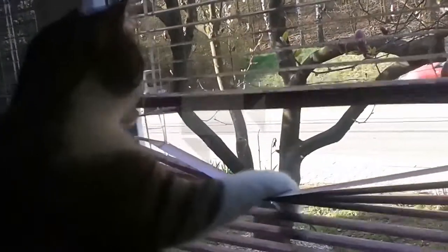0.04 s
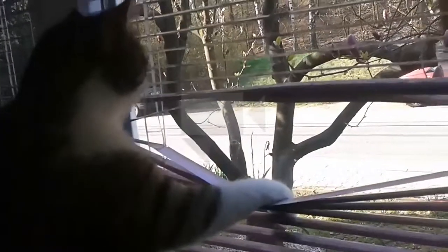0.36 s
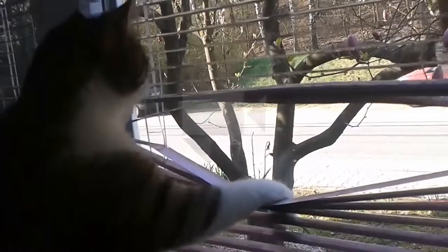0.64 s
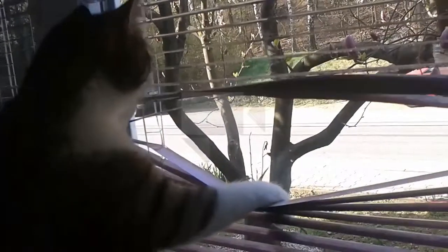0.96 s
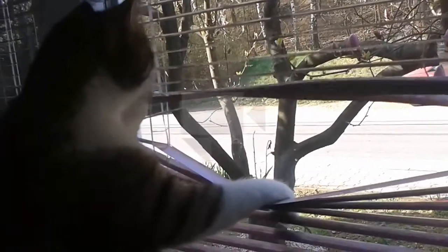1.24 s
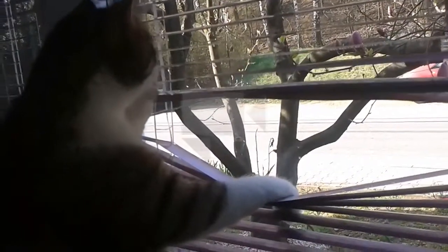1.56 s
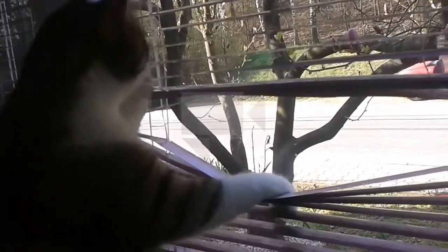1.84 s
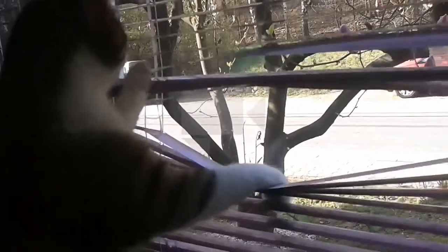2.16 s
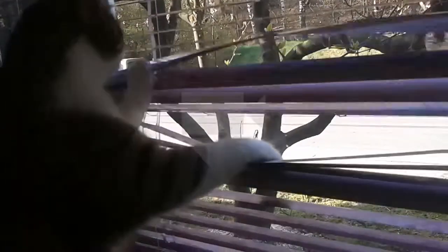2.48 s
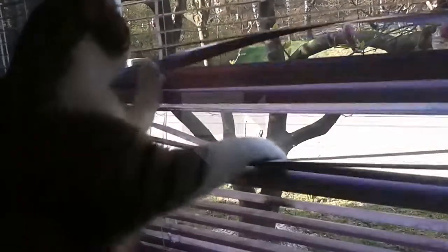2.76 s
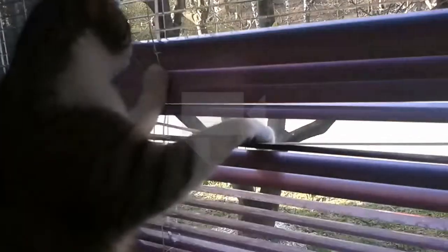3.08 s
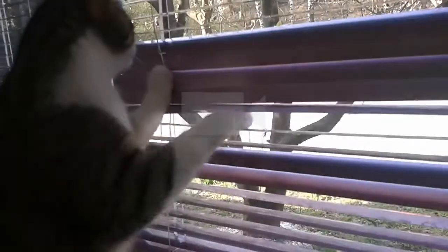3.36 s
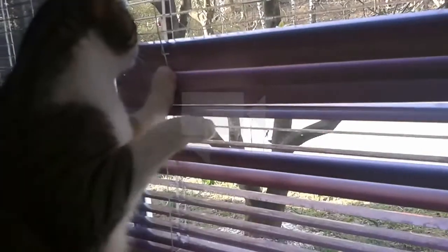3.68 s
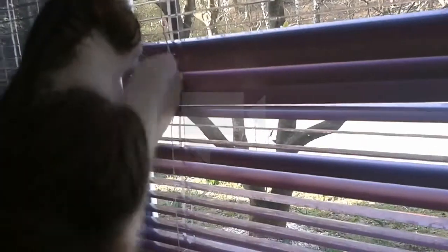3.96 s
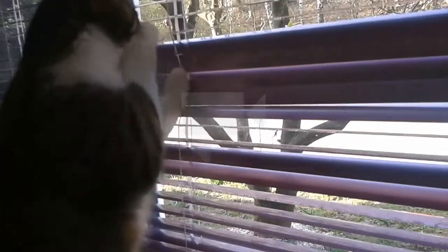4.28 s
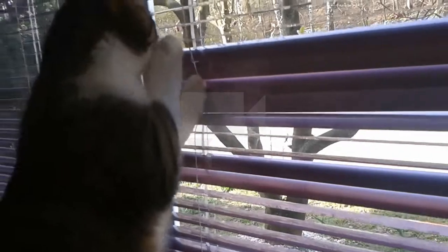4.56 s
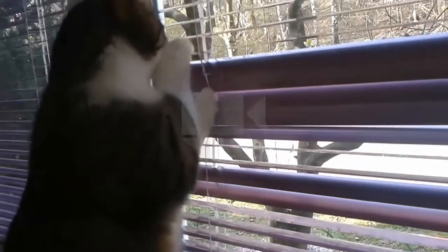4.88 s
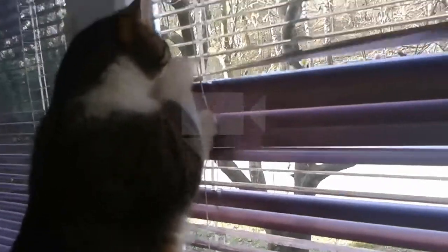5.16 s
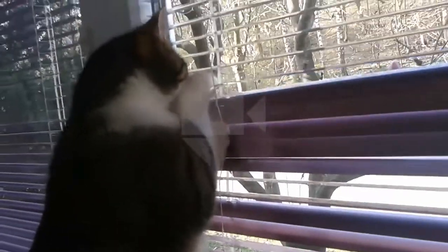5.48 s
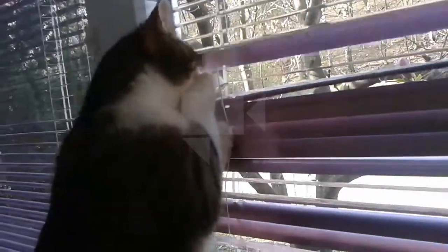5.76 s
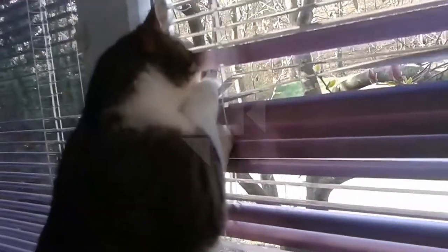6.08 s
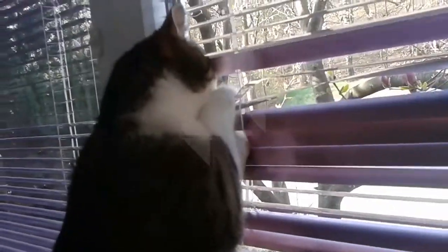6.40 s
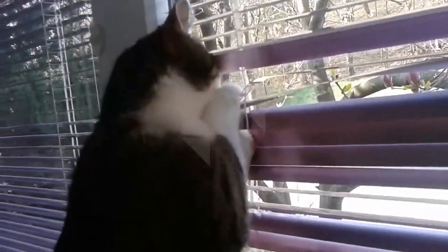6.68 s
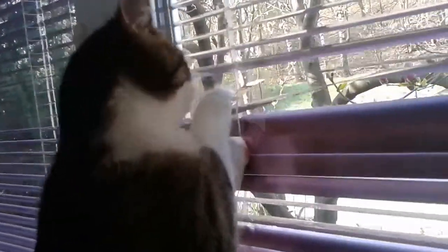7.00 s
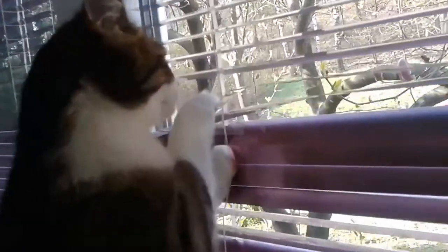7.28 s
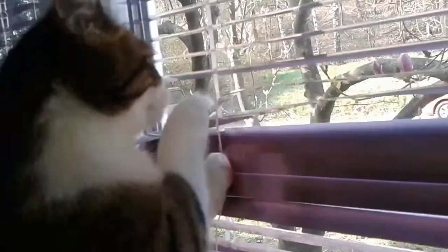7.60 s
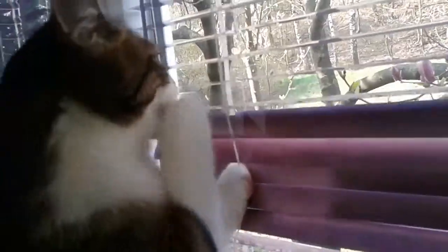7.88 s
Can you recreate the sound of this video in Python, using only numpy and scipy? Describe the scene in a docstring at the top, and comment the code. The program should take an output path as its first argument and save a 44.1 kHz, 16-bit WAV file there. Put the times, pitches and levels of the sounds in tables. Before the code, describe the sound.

A cat paws at window blinds in a quiet room, heard close up with a short room echo and steady faint hiss. A small snap and scrape open the sound, followed by soft pats and rustles until about 1.2 seconds. After a lull, the slats scrape at 2.4 seconds, then break into a loud, bright clatter with tiny squeaks from 2.8 to 3 seconds. Another sharp snap lands at 3.3 and a lighter scrape at 3.6. The blind rings briefly with a thin metallic tone after the harder hits. Fur brushes faintly along the slats between knocks. A single sharp snap comes at 5 seconds, short scrapes at 5.5 and 5.8, then light ticks and pats from 6 to 7.4. The loudest burst of snapping, rattling slats arrives at about 7.8 seconds, ringing briefly at the end.

```python
"""A quiet room, close to the window blinds: a cat pushes its paws through them.
Slats scrape, snap and clatter in bursts of tiny collisions; some edges stick and squeak.
Fur brushes the slats between knocks. The blind rings near 1.3 kHz after the harder ones,
and the room adds a short tail over steady hiss."""
import sys
import numpy as np
from scipy import signal
from scipy.io import wavfile
from scipy.ndimage import uniform_filter1d

SR = 44100
rng = np.random.default_rng(int(sys.argv[2]) if len(sys.argv) > 2 else 0)


def unload_wav(signal):
    """Save mono or channel-first audio to the path in sys.argv[1] as 16-bit WAV at rate SR, clipped to [-1, 1]."""
    wavfile.write(
        sys.argv[1],
        SR,
        np.round(np.clip(np.atleast_2d(signal).T, -1, 1) * 32767).astype(np.int16),
    )


N = 350154


def clatters(gain_db=5, modes_db=-39, ripple_db=3.6):
    """Each push is a burst of collisions, coloured by where and how hard the slats meet."""
    # slat collision spectrum: (frequency [Hz], gain [dB])
    slat_spectrum = [(30, -28), (90, -22.5), (175, -7.5), (350, -3.5), (800, 2), (1100, -1), (1850, -1),
                     (2700, 2), (3700, -4), (5400, 2.5), (7200, -3.5), (9500, 1.5), (12500, 1),
                     (15500, -8.5)]
    ripple_hz = np.geomspace(400, 16000, num=110)
    thinning, gentle_db = .28, -60
    out = np.zeros(N)
    for start_s, rise_s, t60_s, level_db, knock_db, fizz_db in contacts():
        force = stroke(rise_s, t60_s)
        impacts = collisions(len(force), per_s=3000, spread_db=2.5, rub=.57)
        burst = np.pad(force * impacts, (0, 1024))
        thud_db = knock_db - thinning * (level_db - gentle_db)  # harder contact, thinner bass
        contact_spectrum = [(200, 1 + 1.05 * thud_db), (750, thud_db), (1600, knock_db),
                            (3000, knock_db), (4400, 0), (6800, 0), (9500, fizz_db)]
        # each length of slat has its own short-lived resonances
        ripple = np.c_[ripple_hz, ripple_db * np.clip(rng.standard_normal(len(ripple_hz)), -2, 2)]
        burst = colour(burst, slat_spectrum, contact_spectrum, ripple)
        add(out, start_s, amp(level_db + gain_db) * slat_modes(burst, modes_db))
    return out


def contacts():
    """All slat contacts: (time [s], rise [s], t60 [s], level [dB], knock [dB], fizz [dB])."""
    # knock (mids) and fizz (top treble) are relative to the level
    # bent slat flicks past its neighbour: (time [s], rise [s], level [dB], knock [dB], fizz [dB])
    snaps = [(.0004, 0.0083, -22, 0.5, -16), (0.0841, 0.0057, -30, -7.5, -6), (.116, .003, -35, -10, -5),
             (2.449, .01, -26, 4.5, -3), (2.9589, 0.0043, -17, 1.5, -6), (2.972, .0044, -12, -12, -5),
             (2.979, 0.0062, -13.5, -5.5, -6), (3.309, .007, -11.5, -1, -8.5),
             (4.9858, 0.0088, -13, -14, -5.5), (7.815, 0.0019, -9.5, -8, -11),
             (7.8203, 0.0029, -9, -5, -2.5), (7.829, .0014, -9.5, -7, -1)]
    # soft paw pats slats together: (time [s], level [dB], knock [dB])
    pats = [(.231, -41, 9), (.289, -39, 3), (.328, -51, 18), (.351, -41, 11), (.480, -35.5, 6.5),
            (.952, -43, 3.5), (1.126, -43.5, 12), (2.107, -56, 12.5), (2.147, -51.5, 11),
            (2.267, -45.5, 1.5), (5.274, -51, 9), (5.846, -44.5, 17), (6.858, -41, 1), (6.955, -38.5, -1.5),
            (7.176, -40, 1.5), (7.799, -25.5, 0)]
    # slats slide under growing pressure: (time [s], rise [s], t60 [s], level [dB], knock [dB])
    scrapes = [(.011, 0.025, 0.25, -38, 1), (.354, 0.016, .23, -41, 8), (1.002, .021, .16, -46.5, -6),
               (1.146, 0.026, 0.23, -52.5, 10), (2.351, 0.053, .6, -38.5, -2),
               (2.412, 0.013, 0.23, -27.5, 0), (2.598, .014, .08, -38.5, 1.5),
               (2.837, .033, .13, -19.5, -5.5), (2.8773, 0.035, 0.36, -27.5, -8.5),
               (2.911, 0.036, 0.4, -21.5, -6.5), (3.594, .026, 0.19, -32, 2),
               (5.447, 0.048, 0.14, -47.5, 4.5), (5.532, 0.046, 0.067, -26, -0.5),
               (5.845, .025, .16, -26.5, -1.5), (5.879, 0.024, .15, -35.5, 7.5),
               (6.071, .041, .22, -46, 4.5), (6.127, .014, .12, -41.5, 6), (6.86, 0.01, 0.21, -45, 4.5),
               (7.838, 0.0072, 0.17, -14, -4.5), (7.865, 0.0035, 0.19, -24.5, -2.5),
               (7.907, .021, .13, -31, -7)]
    # slat edge ticks against a cord: (time [s], level [dB])
    ticks = [(6.012, -26.5), (7.4015, -29)]
    return ([(s, rise, .057, db, knock, fizz) for s, rise, db, knock, fizz in snaps]
            + [(s, .0059, .098, db, knock, -12.5) for s, db, knock in pats]
            + [(s, rise, t60, db, knock, -7.5) for s, rise, t60, db, knock in scrapes]
            + [(s, .0017, .02, db, -7.5, -22) for s, db in ticks])


def slat_modes(burst, gain_db, size=12000):
    """Collisions set the slats ringing; tuning varies by slat, most in the high modes."""
    # slat bending modes: (frequency [Hz], relative level [dB], t60 [s])
    bending_modes = [(1735, -26, 0.085), (2613, -12, 0.13), (3185, -13.5, 0.17), (3590, -4.5, 0.1),
                     (4200, -27, 0.23), (4460, -23, 0.2), (5000, -17, 0.26), (5570, -26, 0.091),
                     (6300, -10, 0.11), (6810, -26, 0.073), (7840, -13, 0.15), (8172, -14, .11),
                     (8500, -28, .11), (9900, -20, 0.23), (11600, -23, .1), (12700, -20, .11)]
    hz, level_db, t60_s = np.transpose(bending_modes)[:, :, None]
    t = np.arange(size) / SR
    share, phase, tuning = rng.random((3, len(hz), 1))
    hz = hz * (1 + (tuning - .5) * .07 * (hz / hz.max()) ** 2)
    envelope = amp(level_db + gain_db) * (.5 + share) * np.exp(-np.log(1000) * t / t60_s)
    modes = envelope * np.sin(2 * np.pi * (hz * t + phase))
    return np.pad(burst, (0, size - 1)) + signal.fftconvolve(burst, modes.sum(0))


def squeaks(glide_octaves=-.054, jitter=.012, overtone_db=-18):
    """An edge sticks and slips at an unsteady pitch that sags as it lets go."""
    # slipping edges: (time [s], length [s], pitch [Hz], level [dB])
    slips = [(.004, 0.0081, 5400, -21), (2.842, .032, 11840, -22), (2.844, 0.04, 6400, -24.5),
             (2.848, 0.022, 7750, -27.5), (2.851, .028, 4370, -15), (2.866, 0.016, 5780, -15),
             (2.929, .021, 2396, -30.5), (2.973, 0.0097, 2530, -18), (3.313, .011, 2580, -21.5),
             (3.316, .006, 4820, -18.5), (4.989, 0.012, 5850, -16.5), (4.992, .0075, 11880, -21),
             (7.8145, 0.0158, 5550, -7.5)]
    out = np.zeros(N)
    for start_s, length_s, hz, level_db in slips:
        position = np.linspace(-.5, .5, int(length_s * SR))
        pitch_hz = hz * 2 ** (glide_octaves * position) * (1 + jitter * waver(len(position), size=50))
        phase = 2 * np.pi * np.cumsum(pitch_hz) / SR
        tone = np.sin(phase) + amp(overtone_db) * np.sin(2 * phase) * (hz < SR / 4)
        grip = 1 + .3 * waver(len(position), size=50)
        window = np.cos(np.pi * position) ** 2
        add(out, start_s, amp(level_db) * unit(tone * grip) * window)
    return out


def blind_ring(slats, ring_hz=1296, width_hz=500, ring_t60_s=.35, gain_db=-8):
    """The whole blind stores contact energy near its note; loose slats roughen the ring."""
    # paw lets go, blind or slat rings freely: (time [s], swell [s], t60 [s], pitch [Hz], level [dB])
    releases = [(.332, .003, .06, 1720, -37), (.355, .003, .08, 1720, -34), (2.955, .008, .42, 1280, -36),
                (3.313, 0.011, 0.32, 1290, -39), (3.6, 0.022, 0.13, 1297, -31.5),
                (4.992, .005, .22, 6130, -35), (5.54, .025, .39, 1295, -34.5),
                (7.835, 0.017, .1, 1278, -25), (7.84, 0.013, .25, 3185, -28),
                (7.866, .013, .97, 1282, -29.5)]
    band = signal.butter(2, [ring_hz - width_hz / 2, ring_hz + width_hz / 2], "bandpass", fs=SR)
    drive = signal.lfilter(*band, slats) ** 2
    retention = amp(-120 / (ring_t60_s * SR))
    energy = signal.lfilter([1 - retention], [1, -retention], drive)
    out = amp(gain_db) * np.sqrt(energy) * bending_tone(N, ring_hz)
    for start_s, swell_s, t60_s, hz, level_db in releases:
        envelope = stroke(swell_s, t60_s)
        add(out, start_s, amp(level_db) * envelope * bending_tone(len(envelope), hz))
    flutter = unit(1 + .23 * waver(N, size=400))
    return out * flutter


def bending_tone(count, hz, drift_hz=10, shake_hz=20):
    """Sine, rms 1, whose pitch shifts as the slats bend."""
    bend_hz = drift_hz * waver(count, size=900) + shake_hz * waver(count, size=120)
    return np.sqrt(2) * np.sin(2 * np.pi * np.cumsum(hz + bend_hz) / SR)


def brushing(catch_db=2):
    """Fur and paws rub faintly along the slats, catching and letting go."""
    # rubbing as the cat moves: (time [s], level [dB])
    movement = [(0, -45.5), (.2, -54.5), (.45, -49), (.8, -55), (1.2, -55.5), (2, -60.5), (2.25, -53),
                (2.7, -55), (3.28, -49.5), (3.85, -54), (4.4, -59), (4.95, -59.5), (5.1, -51.5),
                (6.05, -52), (6.3, -61.5), (7.7, -55.5), (7.94, -47)]
    # rubbing spectrum: (frequency [Hz], relative level [dB])
    spectrum = [(40, -8.5), (150, -8.5), (400, 6), (900, 1), (2500, 7.5), (5500, -1.5), (8000, -4.5),
                (15500, -8)]
    level_db = np.interp(np.arange(N) / SR, *np.transpose(movement))
    level_db += catch_db * waver(N, size=900)
    grains = collisions(N, per_s=2000, spread_db=4, rub=1)
    return amp(level_db) * unit(colour(grains, spectrum))


def room(direct, gap_s=.0055):
    """Dense reflections after a short gap; the low mids last longest."""
    # reverberation time: (frequency [Hz], t60 [s])
    decay_times = [(200, .5), (530, 0.73), (1400, 0.19), (3700, 0.44), (9700, 0.28), (16000, 0.17)]
    # reverberation against direct sound: (frequency [Hz], level [dB])
    tail_levels = [(200, -7.5), (600, -4.5), (2400, -8), (5500, -15.5), (12000, -13.5)]
    hz, t, noise = signal.stft(rng.standard_normal(SR * 3 // 4), SR, nperseg=256)
    decay = np.exp(-np.log(1000) * t / read(decay_times, hz)[:, None])
    band_energy = (decay ** 2).sum(1, keepdims=True) * t[1] * SR
    decay *= amp(read(tail_levels, hz))[:, None] / np.sqrt(band_energy)
    tail = signal.istft(noise * decay, SR, nperseg=256)[1]
    return signal.fftconvolve(direct, np.pad(tail, (int(gap_s * SR), 0)))[:N]


def hiss(level_db=-53):
    """Steady noise of the room and microphone."""
    # hiss spectrum: (frequency [Hz], relative level [dB])
    spectrum = [(25, -21), (60, -19), (100, -0.5), (135, -2), (400, 3.5), (800, -2), (1400, -6.5),
                (1950, -10.5), (2350, 1.5), (2830, 9), (3300, -3), (4300, -9.5), (5000, 4.5), (6600, -17),
                (10000, -10.5), (15500, -19.5)]
    return amp(level_db) * unit(colour(rng.standard_normal(N), spectrum))


def collisions(count, per_s, spread_db, rub):
    """Tiny impacts of uneven size over smooth rubbing, rms 1."""
    sizes = amp(spread_db * np.clip(rng.standard_normal(count), -2, 2))
    signs = rng.choice([-1, 1], count)
    hits = rng.random(count) < per_s / SR
    return unit(unit(sizes * signs * hits) + rub * rng.standard_normal(count))


def stroke(rise_s, t60_s):
    """Contact envelope: builds ever faster, then dies away as the slats settle."""
    t = np.arange(int((rise_s + t60_s) * SR) + 2) / SR
    rise = np.minimum(t / rise_s, 1) ** 2
    return rise * np.exp(-np.log(1000) * np.maximum(t - rise_s, 0) / t60_s)


def colour(x, *spectra, size=4096):
    """Minimum-phase filter from summed (frequency [Hz], gain [dB]) spectra."""
    hz = abs(np.fft.fftfreq(size, 1 / SR))
    log_gain = np.log(amp(sum(read(points, hz) for points in spectra)))
    taps = np.fft.ifft(np.exp(np.conj(signal.hilbert(log_gain)))).real
    return signal.oaconvolve(x, taps[:size // 2])[:len(x)]


def waver(count, size):
    """Smooth noise, rms 1, changing over about size samples."""
    return unit(uniform_filter1d(uniform_filter1d(rng.standard_normal(count), size), size // 2))


def read(points, hz):
    """Interpolates (frequency [Hz], value) points over log frequency."""
    points_hz, values = np.transpose(points)
    return np.interp(np.log(hz + 1), np.log(points_hz + 1), values)


def add(mix, start_s, sound):
    """Mixes a sound in at start_s."""
    part = mix[max(round(start_s * SR), 0):][:len(sound)]
    part += sound[:len(part)]


def amp(db):
    """Decibels to gain."""
    return 10 ** (np.asarray(db) / 20)


def unit(x):
    """Scales to rms 1."""
    return x / np.sqrt(np.mean(x ** 2) + 1e-20)


def scene():
    """Slats, their room tail, the blind's ring and hiss, in mono."""
    slats = clatters() + squeaks() + brushing()
    return (slats + room(slats) + blind_ring(slats) + hiss())[None]


def record(dry):
    """Clips at full scale, then low-passes at 16 kHz."""
    low_pass = signal.firwin(1023, 16000, window=("kaiser", 9), fs=SR)
    return signal.oaconvolve(np.clip(dry, -1, 1), low_pass[None], "same")


dry = scene()
out = record(dry)
unload_wav(out)
```